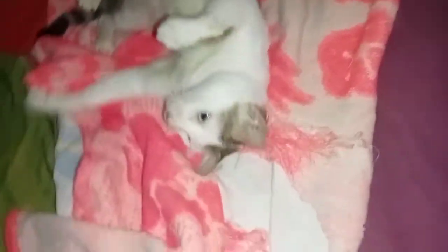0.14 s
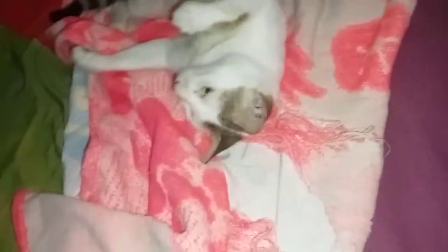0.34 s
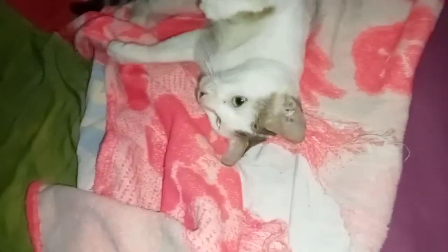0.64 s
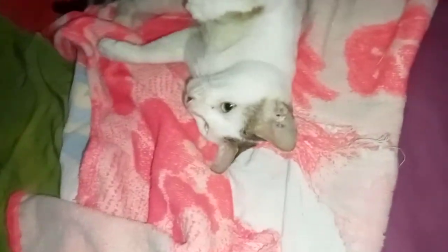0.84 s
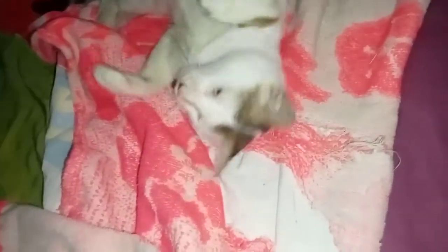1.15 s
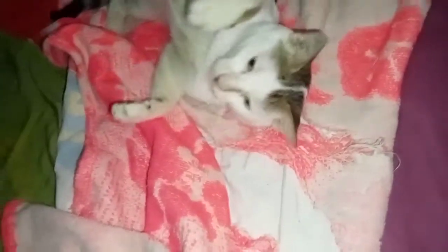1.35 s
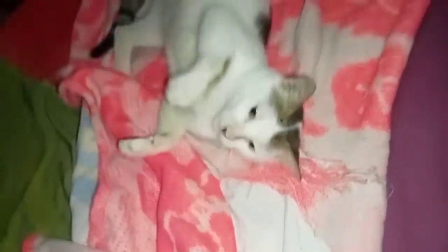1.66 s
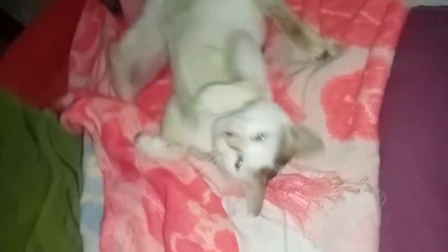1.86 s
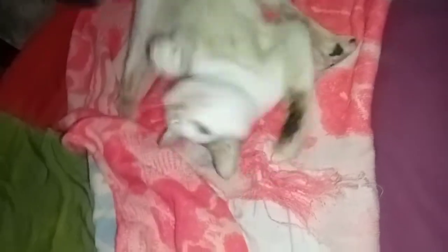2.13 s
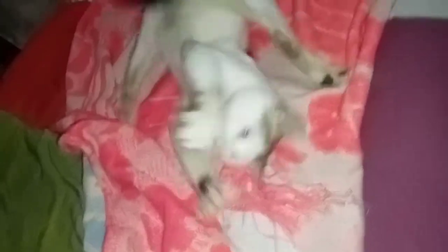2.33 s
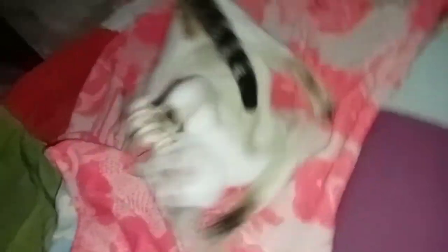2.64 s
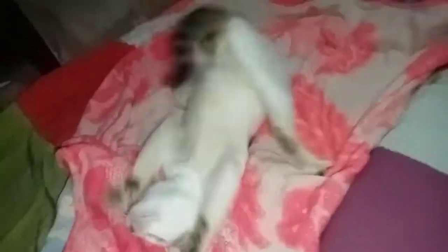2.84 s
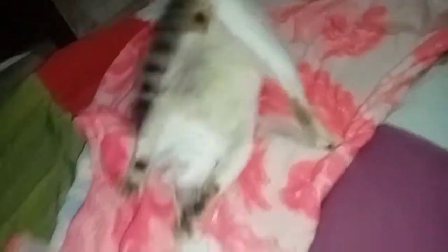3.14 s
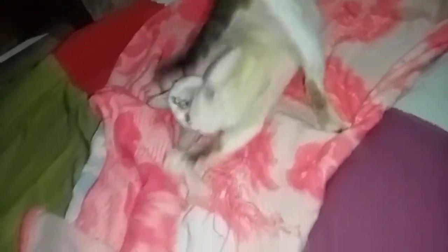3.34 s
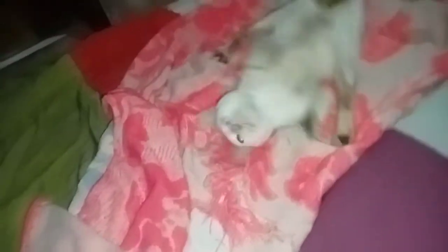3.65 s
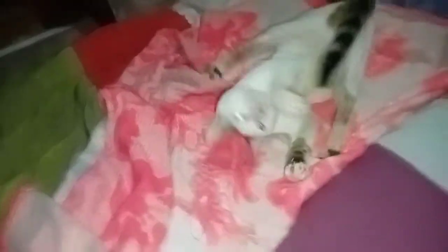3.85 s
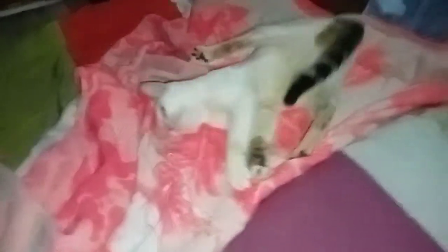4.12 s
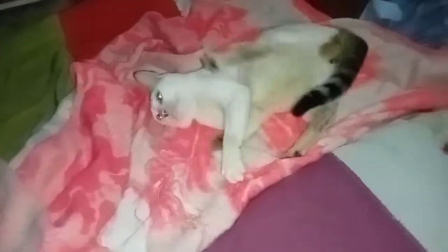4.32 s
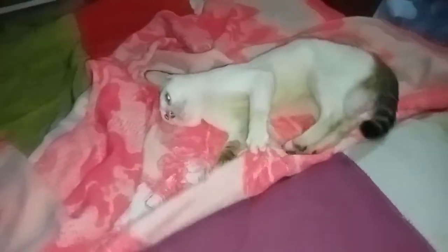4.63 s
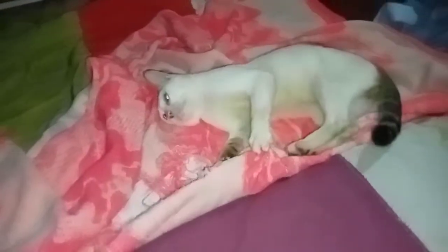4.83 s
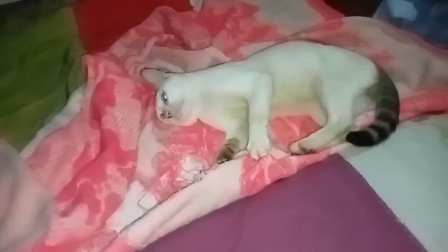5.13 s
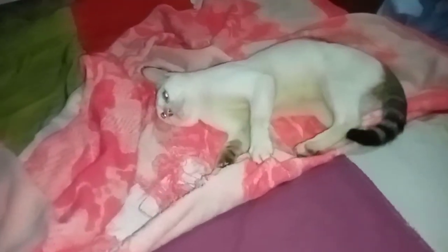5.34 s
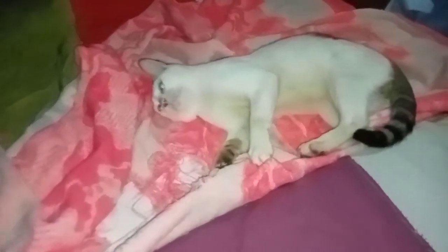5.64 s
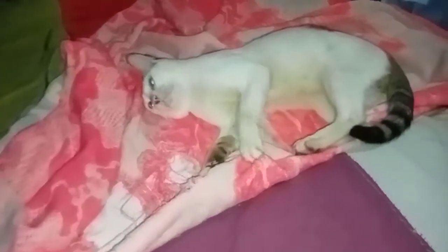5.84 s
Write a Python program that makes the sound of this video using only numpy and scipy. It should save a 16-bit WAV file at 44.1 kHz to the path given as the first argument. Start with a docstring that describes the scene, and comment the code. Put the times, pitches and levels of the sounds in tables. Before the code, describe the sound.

A cat gives one long hiss while frogs croak and crickets trill in the night.

```python
"""A cat hissing at night

A cat on a bed gives one long hiss, turbulent breath resonating in its mouth; later it shuffles on the
blanket and sniffs with a thin whistle. Outside, frogs croak in pulses of the vocal sac and crickets
trill with their wings over a far chorus. A slow one-cylinder engine thumps and a fan hums in the
night air. A phone microphone hears it in mono."""
import sys
import numpy as np
from scipy import signal
from scipy.fft import rfft, irfft, next_fast_len
from scipy.io import wavfile
from scipy.ndimage import map_coordinates

SR = 44100
rng = np.random.default_rng(int(sys.argv[2]) if len(sys.argv) > 2 else 0)


def int16_out(signal):
    """Quantize to a 16-bit WAV file."""
    q = np.round(np.clip(np.atleast_2d(signal).T, -1, 1) * 32767)
    wavfile.write(sys.argv[1], SR, q.astype(np.int16))


N = 263718


def amp(db):
    """Amplitude grows tenfold every 20 dB."""
    return 10 ** (np.asarray(db) / 20)


def along(points, hz):
    """Interpolation of (Hz, value) points on a logarithmic frequency axis."""
    f, values = np.transpose(points)
    return np.interp(np.log(hz + 1), np.log(f + 1), values)


def curves(rows):
    """Linear envelopes, one for each column after the time."""
    times, *columns = np.transpose(rows)
    return [np.interp(np.arange(N) / SR, times, column) for column in columns]


def wobble(rate):
    """Smooth random modulation: a spline through rate knots a second."""
    coarse = np.arange(0, N + 16, 16)
    knots = rng.standard_normal(int(N * rate / SR) + 4)
    return np.interp(np.arange(N), coarse, map_coordinates(knots, [coarse * rate / SR]))


def window(start, length, edge):
    """A gate with smooth edges; all times in seconds."""
    ramp = np.interp(np.arange(N) / SR - start, [0, edge, max(length - edge, edge), length], [0, 1, 1, 0])
    return ramp * ramp * (3 - 2 * ramp)


def filtered(x, response):
    """Linear filtering multiplies the spectrum by a frequency response."""
    size = next_fast_len(N + SR // 2)
    return irfft(rfft(x, size) * response(np.fft.rfftfreq(size, 1 / SR)), size)[:N]


def peak(f, hz, width):
    """Band-pass response of a damped resonator."""
    return 1j * f * width / (hz * hz - f * f + 1j * f * width)


def noise(response):
    """White noise coloured by a response and scaled to rms 1."""
    x = filtered(rng.standard_normal(N), response)
    return x / np.sqrt(np.mean(x ** 2) + 1e-20)


def band(hz, width, order=2):
    """Noise through identical resonators in cascade."""
    return noise(lambda f: peak(f, hz, width) ** order)


def shaped(spectrum):
    """Noise with a spectral envelope of (Hz, relative dB) points."""
    return noise(lambda f: amp(along(spectrum, f)))


def reverberant(x, t60, wet_db):
    """Direct sound plus a diffuse tail that decays 60 dB in t60 seconds."""
    t = np.arange(SR // 2) / SR
    tail = rng.standard_normal(len(t)) * amp(-60 * t / t60) * (t > .006)
    return x + amp(wet_db) * signal.fftconvolve(x, tail / np.linalg.norm(tail))[:N]


def cavities(f, modes):
    """Cavity modes superpose with alternating signs under one broad resonance."""
    response = sum((-1) ** k * amp(db) * peak(f, hz, width) for k, (hz, width, db) in enumerate(modes))
    return response * peak(f, 3380, 2000)


def hiss():
    """Turbulent breath excites the mouth's resonances; the jet past the teeth adds bright bands."""
    # Each row: time in seconds, breath level in dB, jet level in dB relative to the breath.
    effort = [(.72, -56, -15), (.77, -38.5, -23), (.85, -31, -13.5), (.95, -23, -15.5), (1.13, -13, -13),
              (1.28, -15, -13), (1.45, -21, -16.5), (1.72, -35, -18), (1.9, -36, -30), (2.1, -40.5, -35),
              (2.29, -37.5, -30), (2.36, -60, -30)]
    # Each row: frequency in Hz, width in Hz, relative level in dB.
    main_modes = [(2913, 410, -9), (3364, 147, 3), (3595, 310, -11)]
    side_modes = [(1750, 650, -15.5), (2300, 306, -3), (3980, 260, 1), (4600, 580, -19)]
    edge_tones = [(7890, 350, 4.5), (9100, 360, -11), (10900, 650, -9.5), (13800, 700, -14)]
    # Each row: frequency in Hz, relative spectral density in dB.
    jet_spectrum = [(2940, -49), (5000, -17), (5630, -21), (6080, -6), (6980, 2), (7940, -6.5), (9500, -17),
                    (12400, -44), (20900, -120)]
    fizz_spectrum = [(7000, -38), (9000, -8), (10000, -0.5), (10900, -2), (12200, -2), (14000, -8),
                     (15500, -4.5)]
    breath_db, jet_db = curves(effort)
    fizz_db = -14.5 + 0.46 * breath_db + 0.48 * jet_db
    gate = window(effort[0][0], effort[-1][0] - effort[0][0], edge=.02)
    jaw = 0.61 + 0.32 * np.tanh(wobble(6.63))  # blends a lower and a higher tuning of the main cavity
    mouth = np.sin(jaw) * noise(lambda f: cavities(1.04 * f, main_modes))
    mouth += np.cos(jaw) * noise(lambda f: cavities(f, main_modes))
    mouth += amp(-7.5) * noise(lambda f: cavities(f, side_modes))
    jet = amp(jet_db) * shaped(jet_spectrum) + amp(fizz_db) * shaped(fizz_spectrum)
    jet += sum(amp(fizz_db + db + 4.1 * wobble(8.9)) * band(hz, width) for hz, width, db in edge_tones)
    throat = amp(0.61 * breath_db - 29.5) * band(700, 900, order=1)  # grows with effort
    flutter = amp(0.63 * wobble(30.23) + 0.37 * wobble(120))  # unsteady airflow
    return reverberant(gate * amp(breath_db) * flutter * (mouth + jet + throat), t60=0.55, wet_db=-13.0)


def frogs():
    """Amplitude modulation: the vocal sac's wavering tone comes in pulses; higher callers are hoarser."""
    # Each row: start in seconds, length in seconds, pitch in Hz, pitch rise in Hz, level in dB.
    croaks = [(-.2, .25, 1850, 0, -48.5), (.4, .11, 1855, 0, -48.5), (0.499, .29, 1900, 38.5, -34.5),
              (0.976, 0.36, 1864, -14, -28), (2.136, 0.27, 1908, 37, -35), (3.368, 0.36, 1848, 0.5, -28.5),
              (3.419, 0.3, 1925, 2, -37.5), (3.999, .2, 1905, -1, -47.5), (4.482, .29, 1909, 8, -32.5),
              (4.781, 0.31, 1903, 27, -38.5), (5.2, 0.15, 1843, 7, -24.5), (5.382, 0.12, 1847, -2, -23.5)]
    pulse_hz, unevenness, pulse_floor = 27.46, .15, 0.16
    scatter_db, scatter_hz, end_fade_db = 2, 7.2, 5.5
    voiced, hoarseness = np.zeros(N), np.zeros(N)
    waver, hurry = np.cumsum(11 * wobble(90)) / SR, wobble(14)
    for (start, length, hz, rise_hz, db), draws in zip(croaks, rng.standard_normal((len(croaks), 2, 20))):
        span = slice(max(int(start * SR), 0), int((start + length) * SR))
        t = np.arange(N)[span] / SR - start
        beat = np.abs(pulse_hz * t + unevenness * hurry[span] * np.sin(np.pi * t / length))
        size, stray = draws[:, beat.astype(int)]  # each pulse has its own level and pitch
        pulses = pulse_floor + np.abs(np.sin(np.pi * beat)) ** 0.66
        level = amp(db + scatter_db * size - end_fade_db * (2 * t / length - 1) ** 2)
        envelope = level * pulses * window(start, length, 0.0067)[span]
        pitch = hz + rise_hz * (t / length - .5) + scatter_hz * stray
        voiced[span] += envelope * np.sin(2 * np.pi * (np.cumsum(pitch) / SR + waver[span]))
        hoarseness[span] += envelope * amp(-21 + 0.19 * (hz - 1853))
    return reverberant(voiced + hoarseness * band(1933, 84), t60=0.6, wet_db=-9.5)


def crickets():
    """Stridulation: each wing stroke gives a pulse that bends in pitch, roughened by the file's teeth."""
    # Each row: start and end in seconds, pitch and glide in Hz, level in dB, phase swing in radians.
    trills = [(-.02, 0.433, 4058, -10, -35.5, 0.74), (.07, 0.421, 4270, -5, -49.5, 0.1),
              (.49, 0.821, 4186, -2, -43.5, 0.011), (1.919, 2.223, 4045, -5, -36, -0.4),
              (1.85, 2.2, 4370, -2, -51, 0.28), (2.296, 2.623, 4200, 3, -48.5, 2.3),
              (2.61, 2.94, 4043, 0, -38, 1.7), (2.74, 2.987, 4200, 0, -41.5, -1.4),
              (3.157, 3.461, 4210, 5, -45.5, 1.2), (3.521, 3.821, 4063, 6, -36.5, 0.96),
              (3.6, 3.82, 4280, 0, -42, -0.3), (3.857, 4.18, 4215, -4, -46.5, .3),
              (4.159, 4.58, 4240, -3, -46.5, -.4), (4.361, 4.541, 4120, 0, -55, -1.4),
              (4.548, 4.99, 4080, 43, -37.5, 1.25), (4.702, 5.077, 4220, -6, -47.5, -0.3),
              (5.25, 5.6, 4291, -2, -45, 0.5), (5.358, 5.675, 4037, -5, -34.5, 1.07),
              (5.67, 5.82, 4010, 5, -45, 0.84), (5.65, 5.93, 4260, 3, -48, 0.69)]
    stroke_hz, gap_exponent, bend_lead_rad = 64.5, .38, .9
    crest, fade_db = 0.52, 4  # loudest point as a share of the length; loss half a length away
    out, scrape = np.zeros(N), wobble(250) + 1j * wobble(250)
    hurry, strength = wobble(8.8), wobble(12)
    for (start, end, hz, glide, db, swing), (offset, phase) in zip(trills, rng.random((len(trills), 2))):
        span, length = slice(max(int(start * SR), 0), int(end * SR)), end - start
        t = np.arange(N)[span] / SR - (start + end) / 2  # from the middle of the trill
        stroke = 2 * np.pi * (stroke_hz * t + offset) + 0.29 * hurry[span]
        pulses = np.abs(np.sin(stroke / 2)) ** gap_exponent
        swell = amp(db + 2.6 * strength[span] - fade_db * (2 * (t / length + .5 - crest)) ** 2)
        cycles = hz * t + glide * t * t / (2 * length) + phase
        tone = np.exp(1j * (2 * np.pi * cycles + swing * np.sin(stroke + bend_lead_rad)))
        rough_tone = np.imag((1 + 0.24 * scrape[span]) * tone)
        out[span] += window(start, length, 0.03)[span] * swell * pulses * rough_tone
    return reverberant(out, t60=.7, wet_db=-10)


def blanket_rustle():
    """Friction of fur and paws on cloth radiates flickering broadband noise."""
    # Each row: start in seconds, length in seconds, body level in dB, treble level in dB.
    strokes = [(0.852, 0.044, -43, -75), (3.03, 0.12, -67, -70), (3.31, 0.057, -66, -68),
               (3.912, 0.032, -55, -68), (4.153, .06, -59, -64), (4.547, 0.082, -51, -57),
               (4.716, 0.15, -48, -53.5), (4.896, 0.12, -44.5, -51), (4.969, 0.06, -53, -61),
               (5.121, 0.077, -54.5, -63), (5.862, 0.21, -48.5, -68)]
    # Each row: frequency in Hz, relative spectral density in dB.
    cloth_spectrum = [(250, -12), (500, -3.5), (1000, -5.5), (2300, 4.5), (3200, 5), (4500, -13),
                      (5500, -23), (7000, -12), (9000, -29)]
    fibre_spectrum = [(7000, -29), (9000, -12), (12000, -10), (14500, -1), (15500, -2)]
    body, treble = np.zeros(N), np.zeros(N)
    for start, length, body_db, treble_db in strokes:
        contact = window(start, length, edge=0.43 * length)
        body += amp(body_db) * contact
        treble += amp(treble_db) * contact
    body *= shaped(cloth_spectrum)
    treble *= amp(2.5 * wobble(300)) * shaped(fibre_spectrum)
    return amp(1.1 * wobble(150)) * (body + treble)


def paw_thumps():
    """The impact of a paw on the bed gives a brief, low tone burst."""
    # Each row: start in seconds, frequency in Hz, level in dB.
    landings = [(2.05, 205, -54), (5.258, 299.6, -43.5)]
    t = np.arange(N) / SR
    return sum(amp(db) * window(s, 0.018, 0.013) * np.sin(2 * np.pi * hz * t) for s, hz, db in landings)


def nose_whistle():
    """Airflow through the nose sounds a thin tone, unsteady in pitch and level."""
    # Each row: time in seconds, pitch in Hz, level in dB.
    contour = [(5.9, 9000, -75), (5.905, 9300, -63), (5.93, 11400, -60), (5.945, 10800, -72),
               (5.953, 10700, -66), (5.963, 11900, -61), (5.98, 12100, -59)]
    hz, db = curves(contour)
    envelope = window(contour[0][0], .2, .004) * amp(db + 2.5 * wobble(200))
    return envelope * np.sin(2 * np.pi * np.cumsum(hz + 60 * wobble(400)) / SR)


def thread_tick():
    """A claw snaps a thread: the impulse response of a high, heavily damped resonance."""
    # Each row: time in seconds, level of the exciting impulse in dB.
    snaps = [(5.294, -31)]
    impulses = np.zeros(N)
    for start, db in snaps:
        impulses[round(start * SR)] = amp(db)
    return filtered(impulses, lambda f: peak(f, 13500, 5000) ** 2)


def chorus():
    """Far insects and frogs add incoherently into narrow noise bands; one faint insect rasps."""
    # Each row: centre in Hz, resonator width in Hz, level in dB, swell depth in dB.
    callers = [(1558, 130, -63, 1), (1760, 200, -64.5, 4), (1896, 89, -64, 0), (4164, 330, -55, -2),
               (4618, 73, -58, 5), (4712, 116, -54, 4), (7054, 940, -49, .5), (9610, 500, -73.5, 2)]
    # Each row: start in seconds, length in seconds, level in dB.
    rasps = [(2.29, .16, -67), (2.56, .15, -68), (5.32, .16, -65), (5.59, .15, -64)]
    crowd = sum(amp(db + swell_db * (wobble(4.13) + 0.27 * wobble(37))) * band(hz, width, order=3)
                for hz, width, db, swell_db in callers)
    rasp = sum(amp(db) * window(start, length, .06) for start, length, db in rasps) * amp(3 * wobble(60))
    return crowd + rasp * noise(lambda f: peak(f, 5430, 400) ** 3 + .4 * peak(f, 5050, 400) ** 3)


def engine():
    """Periodic firing gives a harmonic series; group delay sets when each pitch of the thump peaks."""
    # Each row: multiple of the firing rate, rms level in dB.
    harmonics = [(9, -70.5), (11, -74.5), (13, -86), (14, -63), (15, -70), (17, -73), (18, -62.5),
                 (19, -73), (23, -74), (24, -80), (27, -79.5), (28, -74), (32, -72.5), (34, -86),
                 (35, -78.5), (41, -72), (42, -70.5), (43, -74.5), (64, -78.5), (68, -72), (69, -83),
                 (70, -69), (71, -65), (96, -74), (98, -77), (99, -86), (120, -77), (126, -87), (128, -73)]
    # Each row: frequency in Hz, group delay in seconds.
    delays = [(120, .005), (230, .03), (350, .036), (600, -.006)]
    firing_hz, scatter_rad = 8.5204, 0.83
    t, hz = np.arange(N) / SR, np.arange(130) * firing_hz
    lag = 2 * np.pi * firing_hz * np.cumsum(along(delays, hz))
    lag += scatter_rad * rng.standard_normal(len(hz))
    return sum(np.sqrt(2) * amp(db) * np.cos(2 * np.pi * hz[k] * t - lag[k]) for k, db in harmonics)


def fan():
    """Tonal noise of a fan: two partials drift together in pitch and waver in level."""
    # Each row: frequency in Hz, rms level in dB.
    partials = [(125, -69.5), (208, -74.5)]
    drifting_time = np.arange(N) / SR + np.cumsum(0.012 * wobble(2.09)) / SR
    return sum(np.sqrt(2) * amp(db + 1.5 * wobble(10)) * np.sin(2 * np.pi * hz * drifting_time)
               for hz, db in partials)


def night_air():
    """The ambient noise floor: broadband air, with a deep hum and a low-mid rush that drift in level."""
    # Each row: frequency in Hz, relative spectral density in dB.
    spectrum = [(25, -27), (45, -39), (80, -5), (140, 1.5), (300, -8.5), (420, -12), (1200, -11.5),
                (1900, -9.5), (3600, -15), (4900, -14), (5450, -54), (6200, -19), (9500, -21),
                (10600, -21.5), (11300, -35.5), (15500, -20)]
    # Each row: time in seconds, hum level in dB, rush level in dB.
    levels = [(0.0, -65, -80), (0.4, -61, -75), (1.2, -73, -78), (2.95, -69, -72), (5.98, -77, -64.5)]
    hum_db, rush_db = curves(levels)
    hum = amp(hum_db) * band(41.6, 4.6)
    rush = amp(rush_db + 3.5 * wobble(9.5)) * band(312, 300)
    return amp(-53 + 1.08 * wobble(2.484)) * shaped(spectrum) + hum + rush


def scene():
    """Superposition: the pressures of all sources add in one channel."""
    calls = hiss() + frogs() + crickets()
    stirring = blanket_rustle() + paw_thumps() + nose_whistle() + thread_tick()
    return (calls + stirring + chorus() + engine() + fan() + night_air())[None]


def record(dry):
    """Band limiting: the phone passes nothing above its cutoff."""
    cutoff_hz = 15510
    return filtered(dry[0], lambda hz: hz < cutoff_hz)[None]


dry = scene()
out = record(dry)
int16_out(out)
```